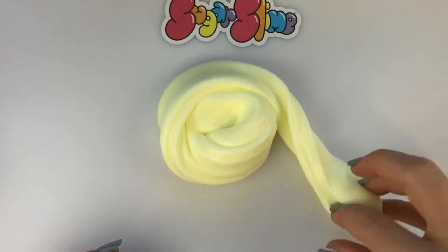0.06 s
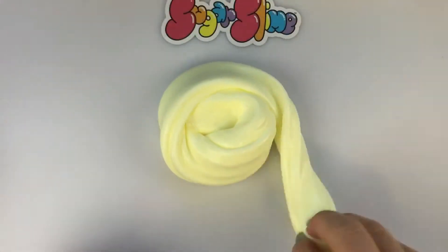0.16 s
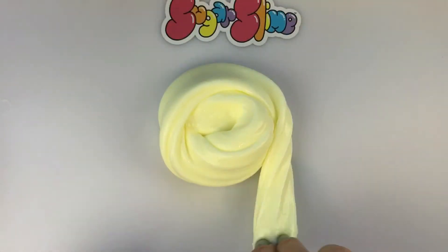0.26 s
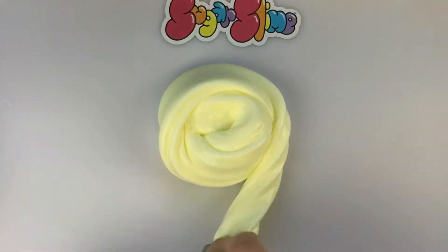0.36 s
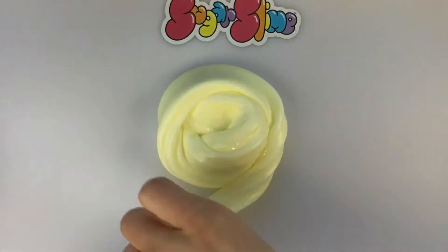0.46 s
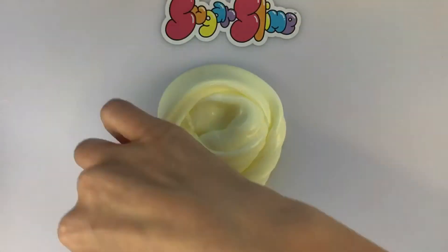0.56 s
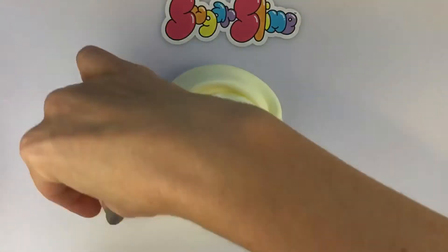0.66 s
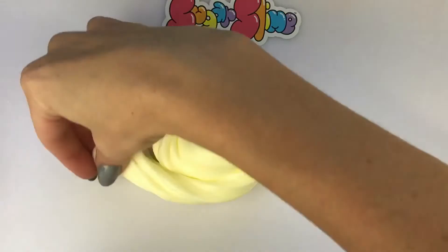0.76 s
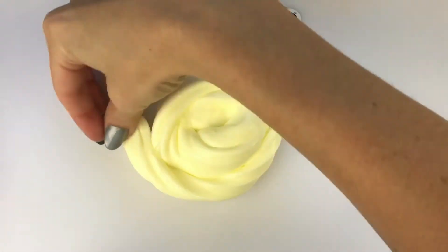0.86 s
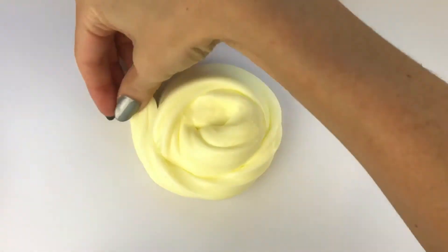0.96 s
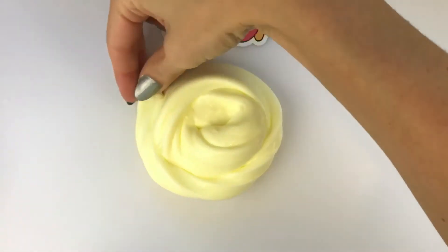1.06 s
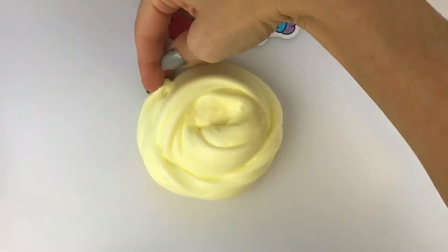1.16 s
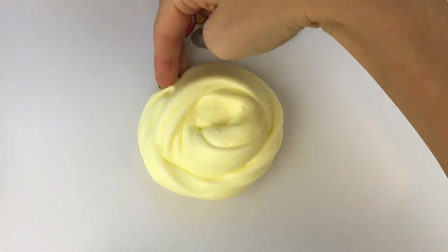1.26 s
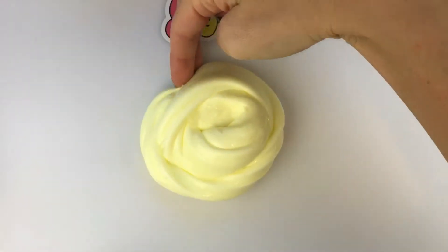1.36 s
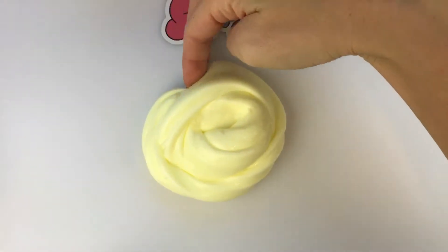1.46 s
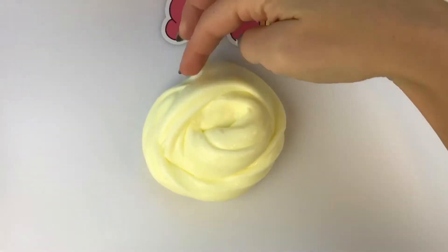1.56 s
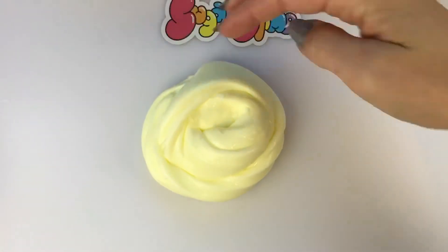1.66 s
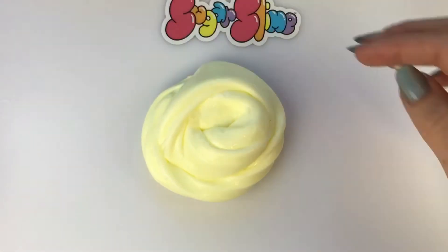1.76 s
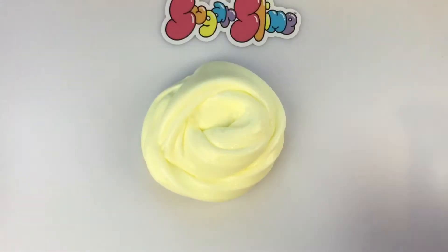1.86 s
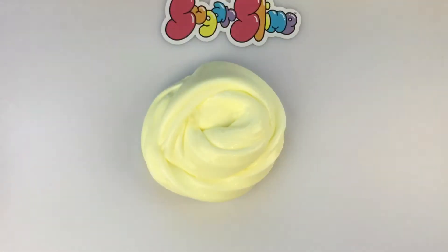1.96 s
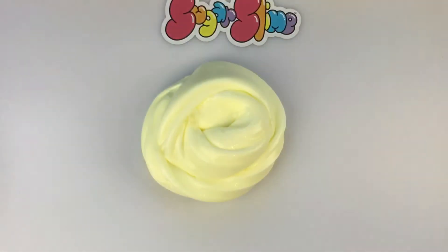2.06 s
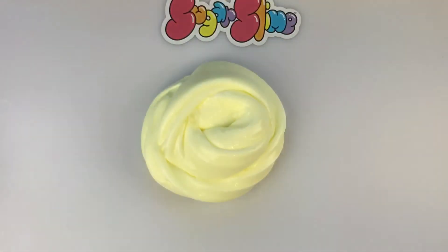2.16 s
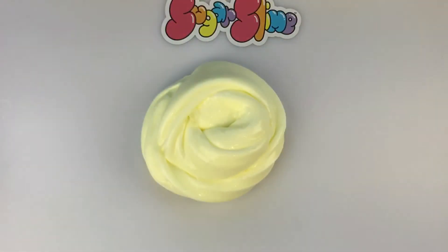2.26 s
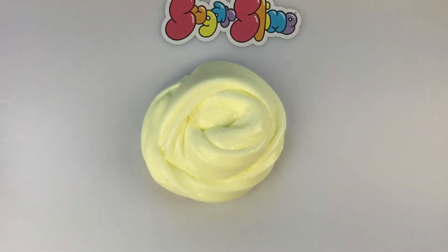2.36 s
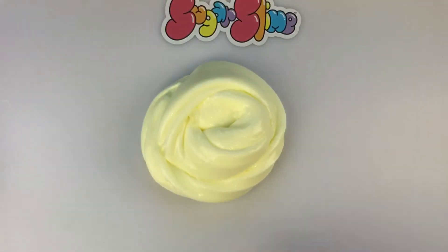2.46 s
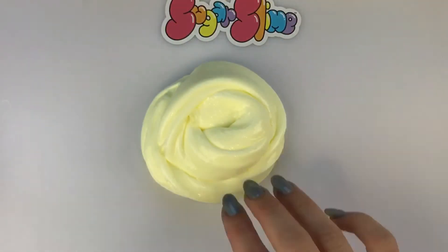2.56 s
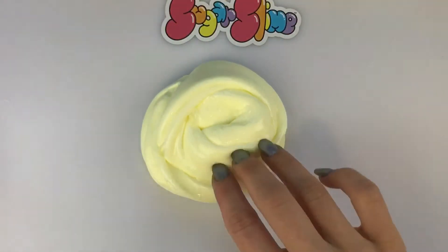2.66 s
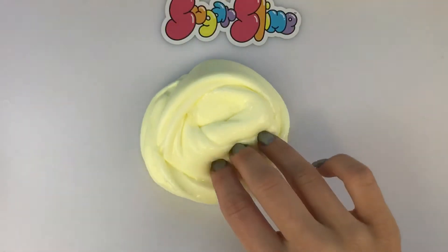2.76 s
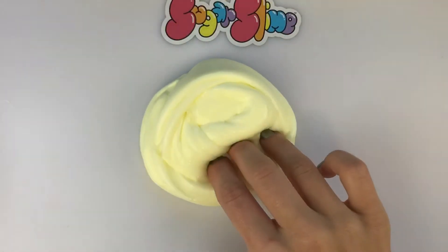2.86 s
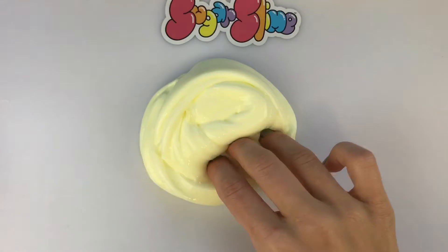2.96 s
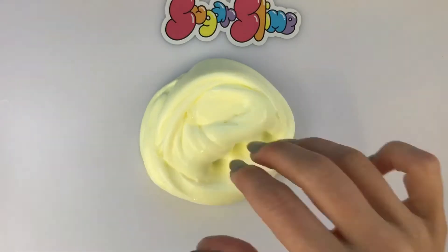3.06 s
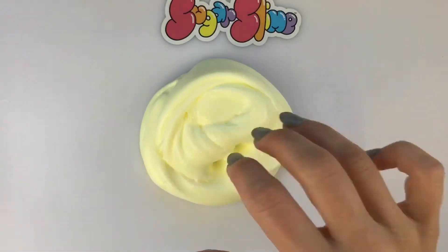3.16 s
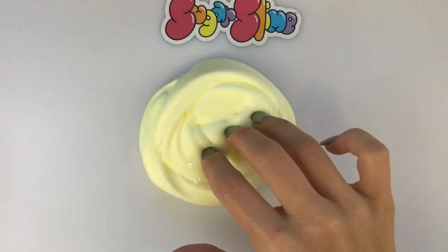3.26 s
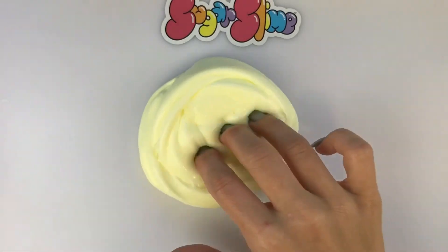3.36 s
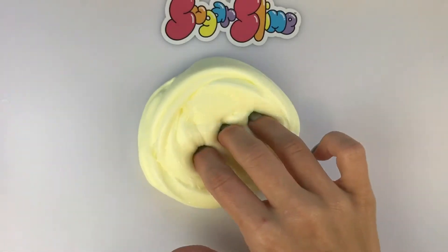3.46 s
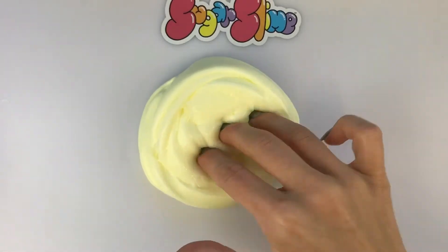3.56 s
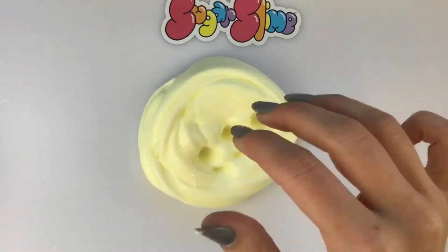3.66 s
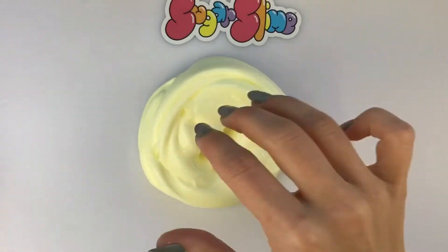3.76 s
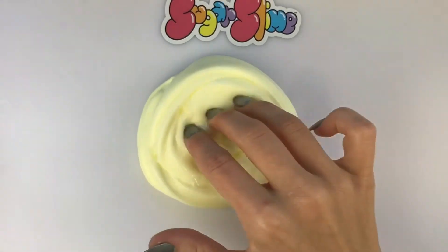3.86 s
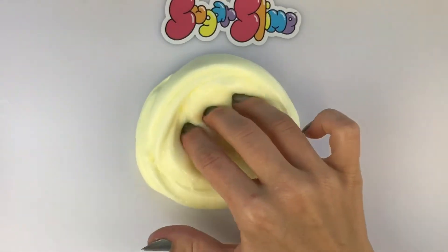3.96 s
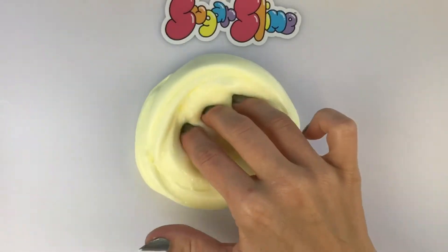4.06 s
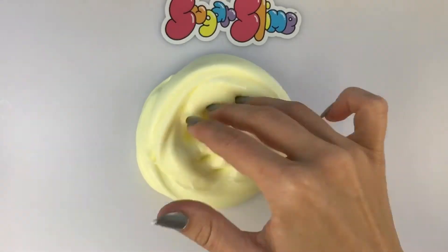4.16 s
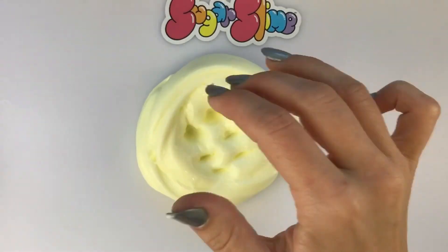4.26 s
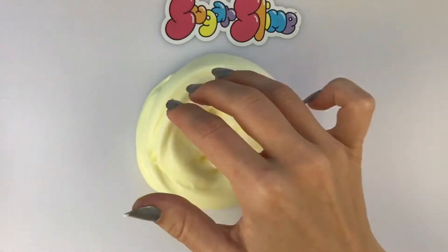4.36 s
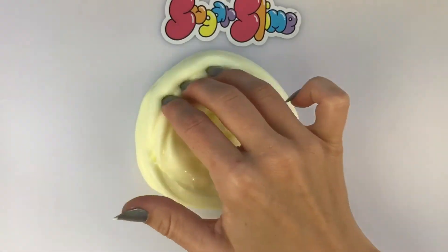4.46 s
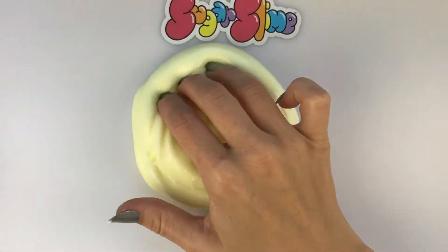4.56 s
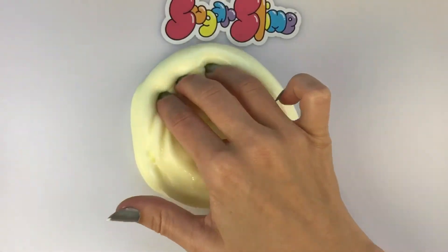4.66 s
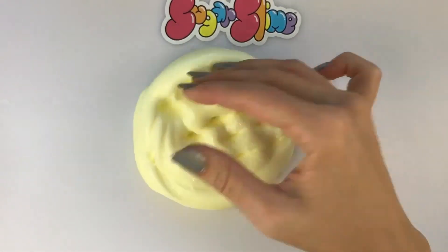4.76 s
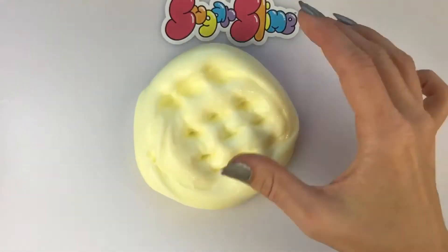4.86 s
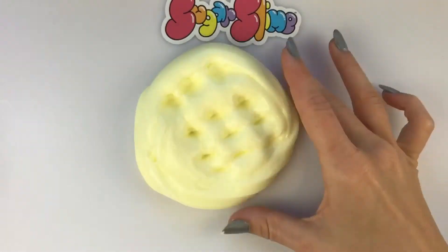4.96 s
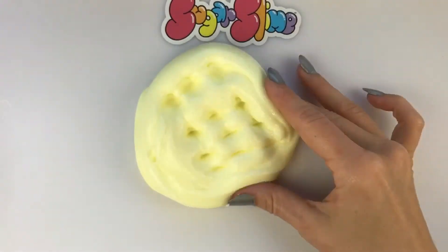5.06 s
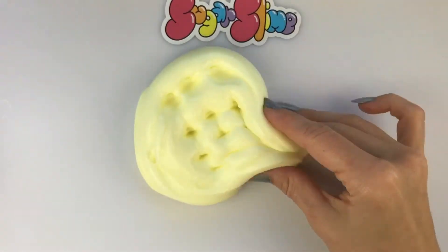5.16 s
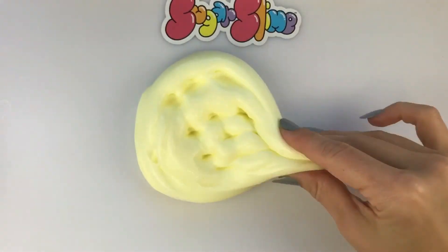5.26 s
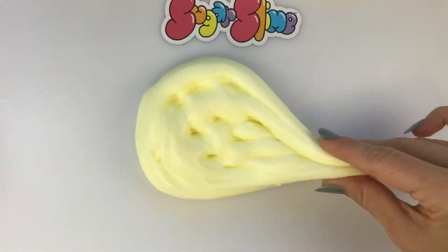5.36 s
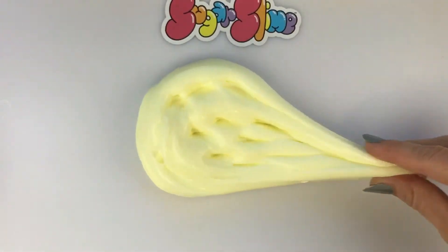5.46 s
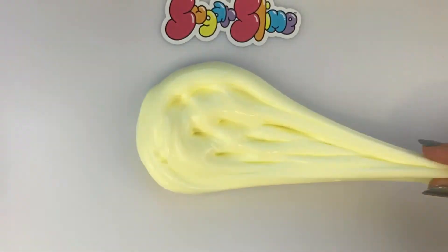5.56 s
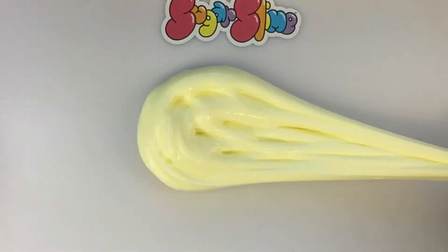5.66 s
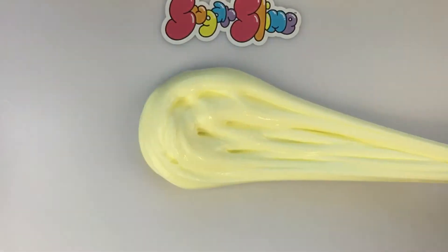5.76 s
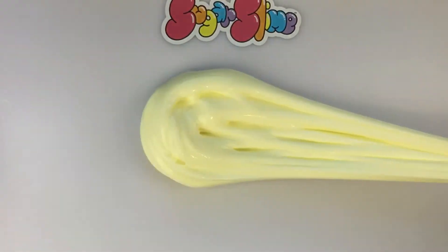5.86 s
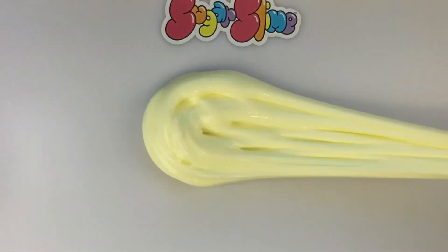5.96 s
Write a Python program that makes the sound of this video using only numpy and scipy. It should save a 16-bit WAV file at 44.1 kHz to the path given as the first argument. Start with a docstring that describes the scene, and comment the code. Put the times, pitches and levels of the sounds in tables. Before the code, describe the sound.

Faint sticky ticks, then several crisp bubble pops and low plops as fingers press into thick slime close by.

```python
"""Low room air and a faint hiss, then small ticks and crackles as fingers work thick slime on a table.
Each finger pulled from its dent opens a quick chain of air pockets: the film snaps, the cavity resonates,
and the dent gives a soft low plop. Between the pokes, sticky skin peels off with a fine crackle,
skin and slime slide with a soft friction noise, and pinhead bubbles burst. One microphone is close by."""
import sys
import numpy as np
from scipy import signal
from scipy.fft import rfft, irfft, next_fast_len
from scipy.io import wavfile
from scipy.ndimage import map_coordinates

SR = 44100
rng = np.random.default_rng(int(sys.argv[2]) if len(sys.argv) > 2 else 0)


def store_wav(level_fs):
    """Save 16-bit WAV to argv[1]."""
    pcm = np.round(np.clip(np.atleast_2d(level_fs), -1, 1) * 32767)
    wavfile.write(sys.argv[1], SR, pcm.T.astype(np.int16))


N = 265041


def amp(db):
    """Amplitude ratio of a level in decibels."""
    return 10 ** (np.asarray(db) / 20)


def unit(x):
    """Normalisation to rms 1."""
    return x / np.sqrt(np.mean(x ** 2) + 1e-20)


def along(points, hz):
    """Interpolation of (Hz, value) points on a logarithmic frequency axis."""
    point_hz, values = np.transpose(points)
    return np.interp(np.log(hz + 1), np.log(point_hz + 1), values)


def fade(t, t60):
    """Exponential decay, 60 dB down at t60."""
    return np.exp(-np.log(1000) * t / t60)


def add(track, start, sound):
    """Superposition: a sound joins the track at a start time in seconds."""
    i = round(start * SR)
    track[i:i + len(sound)] += sound[:len(track) - i]


def coloured(x, points):
    """Minimum-phase filtering with the gain of (Hz, dB) points."""
    size = 2 * next_fast_len(len(x))
    gain = amp(along(points, np.fft.rfftfreq(size, 1 / SR)))
    cepstrum = irfft(np.log(gain), size)
    cepstrum[1:size // 2] *= 2  # folding onto positive time makes the filter causal
    cepstrum[size // 2 + 1:] = 0
    return irfft(rfft(x, size) * np.exp(rfft(cepstrum)), size)[:len(x)]


def noise(points):
    """Stationary coloured noise of rms 1."""
    return unit(coloured(rng.standard_normal(N), points))


def grains(points, per_second, spread_db):
    """Shot noise of rms 1: tiny impulses at random moments with random strengths."""
    impulses = rng.random(N) < per_second / SR
    sizes = amp(spread_db * np.clip(rng.standard_normal(N), -2, 2))
    signs = np.sign(rng.standard_normal(N))
    return unit(coloured(impulses * sizes * signs, points))


def flutter(t, per_second):
    """Smooth random modulation of size about 1."""
    return map_coordinates(rng.standard_normal(2 ** 11), [t * per_second], mode='wrap')


def stroke(start, length, attack_t60, release_t60, build_db):
    """Amplitude envelope of one movement: it sets in, changes by build_db while it lasts, then lets go."""
    t = np.arange(N) / SR - start
    edges = fade(np.maximum(-t, 0), attack_t60) * fade(np.maximum(t - length, 0), release_t60)
    return edges * amp(build_db * (np.clip(t / length, 0, 1) - 1))


def in_room(x):
    """Convolution with direct sound, table reflection, hand scatter and reverberation, new for each call."""
    # Each row: frequency in Hz, reverberation time (t60) in seconds.
    room_decay = [(100, 0.59), (260, 0.47), (1000, 0.39), (4000, 0.29), (13000, 0.19)]
    # Each row: frequency in Hz, gain of scatter and reverberation in dB.
    room_colour = [(60, -7), (240, 12.5), (420, 1.5), (1000, 1), (2000, -2.5), (4000, -5.5), (7000, 0),
                   (15000, -15)]
    hz, frame_s, spectra = signal.stft(rng.standard_normal(SR // 3), SR, nperseg=256)
    decay = fade(frame_s, along(room_decay, hz)[:, None])
    tail = signal.istft(spectra * decay, SR, nperseg=256)[1]
    t = np.arange(len(tail)) / SR
    tail *= 1 - np.exp(-t / 0.0048)
    scatter = rng.standard_normal(len(t)) * fade(t, t60=0.058) * (1 - np.exp(-t / 0.00091))
    diffuse = amp(-17) * tail / np.linalg.norm(tail) + amp(-7.5) * scatter / np.linalg.norm(scatter)
    response = coloured(diffuse, room_colour)
    response[0] += 1  # direct sound
    response[round(0.001024 * SR)] += amp(-26)  # table reflection
    return signal.fftconvolve(x, response)


def background():
    """Broadband noise: low room air, microphone self-noise, and a brief hiss after the loudest pop."""
    # In all three, each row: frequency in Hz, relative spectral density in dB.
    air_colour = [(12, -39.5), (20, -20.5), (43, -2), (107, -1.5), (151, -7), (181, -7), (202, -10.5),
                  (246, -10.5), (367, -15.5), (472, -23), (665, -19), (797, -20.5), (1500, -28.5),
                  (1950, -58), (3300, -120)]
    hiss_colour = [(600, -1.5), (1500, 2), (3000, -0.5), (5200, -3), (6600, 3.5), (7500, -7.5), (9500, -5),
                   (10600, -13.5), (11500, 1.5), (12600, -6.5), (15600, -7.5), (16300, -22.5)]
    linger_colour = [(200, 15), (1000, 3), (3500, 0), (7000, -2), (15500, -5), (16300, -30)]
    linger = amp(-61.5) * stroke(start=3.65, length=0.389, attack_t60=.03, release_t60=.025, build_db=-0.5)
    return amp(-62.5) * noise(air_colour) + amp(-72) * noise(hiss_colour) + linger * noise(linger_colour)


def foam():
    """Sparse shot noise: pinhead bubbles on the surface burst by themselves."""
    # Each row: frequency in Hz, relative spectral density in dB.
    tick_colour = [(3000, -23), (8000, -7), (13000, 0), (16000, -1)]
    return amp(-87.5) * grains(tick_colour, per_second=9, spread_db=4.5)


def resonance(t, hz, t60, onset_cycles, glide, rough):
    """Damped oscillation whose pitch rises and wavers, as when a pocket's floppy mouth opens."""
    pitch = hz * (1 + glide * (.5 - fade(t, t60)) + rough * flutter(t, hz * 0.73))
    onset = 1 - np.exp(-t * hz / onset_cycles)
    ring = np.sin(2 * np.pi * np.cumsum(pitch) / SR) * fade(t, t60) * onset
    radiation = signal.butter(2, 0.41 * hz, 'high', fs=SR)  # little escapes below the resonance
    return signal.lfilter(*radiation, ring)


def snap(t, low_hz):
    """Rupture transient: a film tears in one spike and its shreds fizz; so small a source has little bass."""
    # Each row: frequency in Hz, relative gain in dB.
    film_colour = [(100, -0.5), (600, 10), (2000, 2), (3500, 8), (5500, 0), (9000, -1.5), (11000, -2),
                   (14000, -1), (16500, -21)]
    envelope = fade(t, t60=0.0061) + amp(-2) * fade(t, t60=0.016)  # quick tear, slower shreds
    shreds = rng.standard_normal(len(t)) * envelope
    burst = 1.43 * shreds / np.linalg.norm(shreds)
    burst[0] = 0.51  # the spike
    radiation = signal.butter(1, low_hz, 'high', fs=SR)
    burst = signal.lfilter(*radiation, coloured(burst, film_colour))
    return burst / np.linalg.norm(burst)


def pops():
    """Impulse excitation of a resonator: a pocket's film snaps and the air behind it rings."""
    # Each row: start in seconds, relative ring level in dB, cavity frequency in Hz,
    # ring t60 in seconds, relative snap level in dB.
    bursts = [ (.204, -44.5, 3640, 0.0013, -53), (.619, -47.5, 1390, 0.011, -52),
              (.7203, -50, 2160, .01, -33.5), (.722, -46, 5800, .004, -36),
              (1.4262, -44, 6400, 0.0057, -51), (1.491, -47, 6300, 0.0065, -53),
              (2.319, -31.5, 4100, 0.0025, -48), (2.4933, -39, 1240, 0.0044, -37),
              (2.9006, -41.5, 1040, 0.0074, -62), (3.060, -37.5, 1040, 0.0087, -46),
              (3.0681, -33, 4620, 0.0063, -37), (3.0754, -27.5, 4730, 0.0054, -44),
              (3.0826, -37, 4040, 0.027, -41), (3.0893, -30.5, 5500, 0.0072, -37),
              (3.0927, -31.5, 970, .0057, -37), (3.101, -42, 3770, .015, -37),
              (3.4338, -44.5, 1120, 0.0095, -47.5), (3.468, -46, 1060, .0087, -64),
              (3.636, -38.5, 1760, .014, -52), (3.6413, -14.5, 9040, .0021, -21),
              (3.6416, -14.5, 14200, .003, -58), (3.645, -30.5, 3940, 0.0099, -24),
              (3.658, -15, 2960, 0.0025, -16.5), (3.6587, -25, 2040, 0.0049, -40),
              (3.6609, -27, 1190, .015, -33), (3.6607, -21, 3770, 0.012, -34), (3.669, -38, 687, .025, -34),
              (3.9197, -46.5, 2920, .0094, -42), (4.013, -46, 1080, 0.01, -60),
              (4.1669, -44, 5700, 0.0071, -55), (4.197, -37.5, 2670, .0076, -48),
              (4.2072, -21, 4040, 0.006, -32), (4.2158, -17.5, 3880, 0.003, -17.5),
              (4.217, -21, 820, 0.005, -22), (4.2205, -19.5, 4240, 0.0086, -26),
              (4.2314, -36, 4100, .0035, -28), (4.2349, -35, 900, 0.0076, -44),
              (4.580, -38.5, 1050, .0055, -42.5), (4.5907, -51, 6950, .0027, -23),
              (4.768, -49, 2140, .0069, -43), (4.7816, -24.5, 5970, 0.0045, -23),
              (4.7851, -25.5, 1726, 0.021, -15.5), (4.7866, -23, 1062, .024, -18.5),
              (4.7917, -20, 970, 0.017, -31), (4.8025, -22.5, 705, 0.0072, -36),
              (4.811, -45, 940, 0.011, -40), (4.9382, -20, 2840, 0.0017, -31),
              (4.9384, -11.5, 840, 0.0067, -52), (5.155, -37, 6200, 0.0052, -40),
              (5.211, -42, 9200, .0042, -40), (5.2535, -46, 9900, 0.0055, -42)]
    out, t = np.zeros(N), np.arange(SR // 20) / SR
    for start, ring_db, hz, t60, snap_db in bursts:
        rough = 0.099 * min(1, 0.0089 / t60)  # a firm rim rings both longer and cleaner
        ring = amp(ring_db + 2) * resonance(t, hz, t60, onset_cycles=0.37, glide=0.036, rough=rough)
        crack = amp(snap_db + 6) * snap(t, low_hz=1.45 * hz)
        add(out, start, in_room(ring + crack))
    return out


def sliding():
    """Stick-slip friction: the hand brushes past the mound, and slime drags over the table as it tautens."""
    # In both, each row: start in seconds, length in seconds, level in dB.
    brushes = [(0.592, 0.0035, -59.5), (0.619, 0.029, -54.5)]
    drags = [(0.256, .14, -73), (0.903, .11, -69), (1.056, .05, -72.5), (5.263, 0.0093, -51),
             (5.3, 0.073, -57.5)]
    # In both, each row: frequency in Hz, relative spectral density in dB.
    brush_colour = [(180, -34), (300, -8), (427, -3), (713, -14.5), (1360, -1), (1650, -7), (2790, -5.5),
                    (3480, -17), (3910, -11.5), (6530, -21), (7030, -15), (10000, -32), (13000, -49),
                    (22000, -120)]
    drag_colour = [(400, -8.5), (1000, -6), (1350, -4), (1900, -12.5), (2900, -6), (3400, -0.5), (3900, 1),
                   (4500, -8.5), (6200, -10), (8000, -29)]
    edges = dict(attack_t60=0.033, release_t60=0.064)
    brushing = sum(amp(db) * stroke(start, length, **edges, build_db=4) for start, length, db in brushes)
    dragging = sum(amp(db) * stroke(start, length, **edges, build_db=7) for start, length, db in drags)
    brush = brushing * grains(brush_colour, per_second=1100, spread_db=3)
    drag = dragging * grains(drag_colour, per_second=1600, spread_db=1)
    return in_room(brush + drag)[:N]


def peeling():
    """Adhesion fails in fits under growing tension: wide patches squelch and thin threads crackle."""
    # Each row: start in seconds, length in seconds, release t60 in seconds,
    # squelch level in dB, crackle level in dB.
    peels = [(.31, 0.063, .1, -89, -73.5), (0.634, 0.021, 0.046, -72, -67), (0.748, 0.27, .15, -77.5, -74),
             (1.084, 0.028, .1, -78, -70.5), (1.212, 0.022, .04, -74, -68), (1.421, 0.031, .07, -68, -65.5),
             (1.487, 0.028, 0.11, -76, -74), (1.596, 0.021, .1, -69.5, -70), (1.987, 0.078, .2, -73, -74.5),
             (3.069, 0.026, 0.055, -48.5, -55.5), (3.64, 0.027, 0.056, -44.5, -51),
             (4.201, 0.032, 0.036, -46.5, -53), (4.786, 0.011, 0.18, -42.5, -51),
             (5.071, 0.07, 0.11, -70, -68), (5.155, 0.053, 0.25, -59, -56.5),
             (5.263, 0.12, 0.077, -64, -69.5), (5.58, 0.35, .3, -76.5, -77.5)]
    # In both, each row: frequency in Hz, relative spectral density in dB.
    squelch_colour = [(150, -13), (400, -3), (750, 2), (1400, 2.5), (2100, -8.5), (2700, -7.5), (3700, -4),
                      (5000, -8.5), (9000, -19)]
    crackle_colour = [(1500, -36), (3500, -2.5), (6300, 3.5), (9000, 3.5), (12000, 2), (16000, -7)]
    wide, thin = np.zeros((2, N))
    for start, length, release_t60, squelch_db, crackle_db in peels:
        pull = stroke(start, length, attack_t60=1.4 * length, release_t60=release_t60, build_db=2)
        wide += amp(squelch_db) * pull
        thin += amp(crackle_db) * pull
    fits = amp(1.8 * flutter(np.arange(N) / SR, per_second=110))
    squelch = wide * grains(squelch_colour, per_second=1700, spread_db=5)
    crackle = thin * grains(crackle_colour, per_second=7000, spread_db=7.5)
    return in_room(fits * (squelch + crackle) + pockets(wide))[:N]


def pockets(squelch_gain):
    """Constant-Q resonance: tiny air pockets open where skin peels; small ones ring higher and shorter."""
    per_second, over_squelch_db, spread_db = 90, 7, 2.5
    centre_hz, spread_octaves, ring_cycles = 3160, 1.07, 22.6
    out, t = np.zeros(N), np.arange(SR // 40) / SR
    for when, loudness, pitch in rng.uniform([0, -1, -1], 1, (int(per_second * N / SR), 3)):
        i = int(when * N)
        hz = centre_hz * 2 ** (spread_octaves * pitch)
        ring = np.sin(2 * np.pi * hz * t) * fade(t, ring_cycles / hz)
        add(out, i / SR, squelch_gain[i] * amp(over_squelch_db + spread_db * loudness) * ring)
    return out


def plops_and_thump():
    """Damped resonance: soft low plops as the slime closes a dent, and one dull thump as the hand lands."""
    # Each row: start in seconds, level in dB, frequency in Hz, t60 in seconds. The last is the thump.
    low_rings = [(3.077, -44.5, 253, 0.053), (3.088, -47.5, 138, 0.08), (3.103, -43.5, 237, 0.043),
                 (3.643, -39.5, 220, 0.064), (3.647, -37, 585, 0.052), (3.672, -43, 293, 0.067),
                 (4.217, -39, 295, 0.061), (4.227, -42, 133, 0.06), (4.939, -39.5, 228, 0.021),
                 (4.945, -46.5, 335, 0.085), (5.020, -40, 79, 0.095)]
    out, t = np.zeros(N), np.arange(SR // 6) / SR
    for start, db, hz, t60 in low_rings:
        ring = amp(db) * resonance(t, hz, t60, onset_cycles=0.17, glide=0.18, rough=0.099)
        add(out, start, in_room(ring))
    return out


def scene():
    """Superposition of all sources at one microphone."""
    return (pops() + plops_and_thump() + peeling() + sliding() + foam() + background())[None]


def record(dry):
    """Band limiting: a steep low-pass filter removes the highest treble."""
    cutoff_hz, transition_hz = 16800, 600
    size = next_fast_len(N + SR // 2)
    hz = np.fft.rfftfreq(size, 1 / SR)
    passband = np.clip((cutoff_hz - hz) / transition_hz + .5, 0, 1)
    return irfft(rfft(dry, size) * passband, size)[..., :N]


dry = scene()
out = record(dry)
store_wav(out)
```